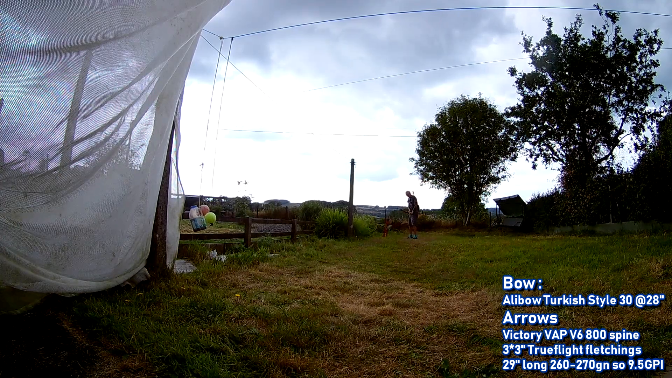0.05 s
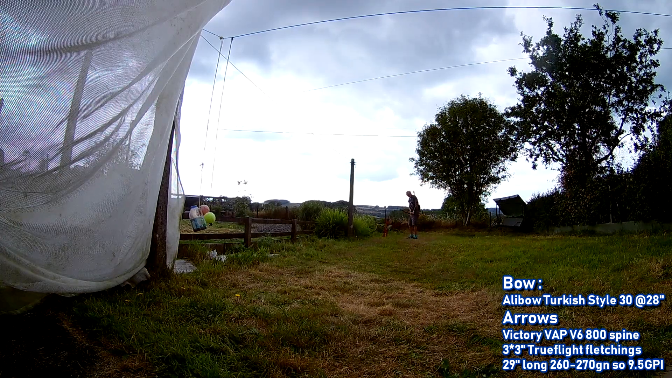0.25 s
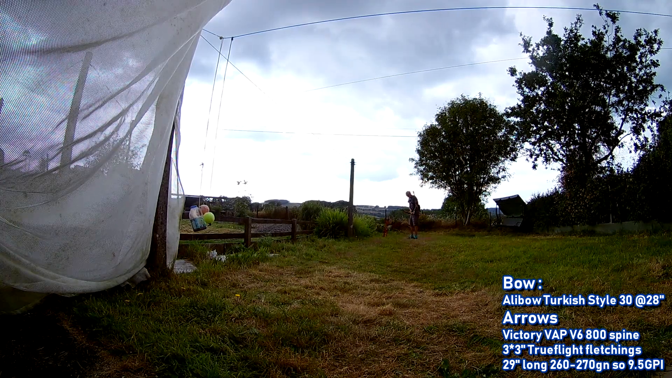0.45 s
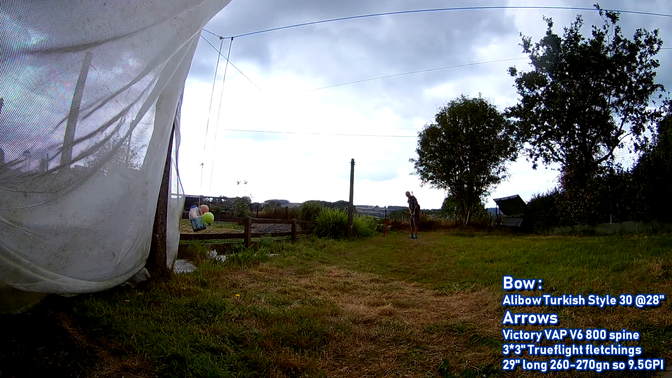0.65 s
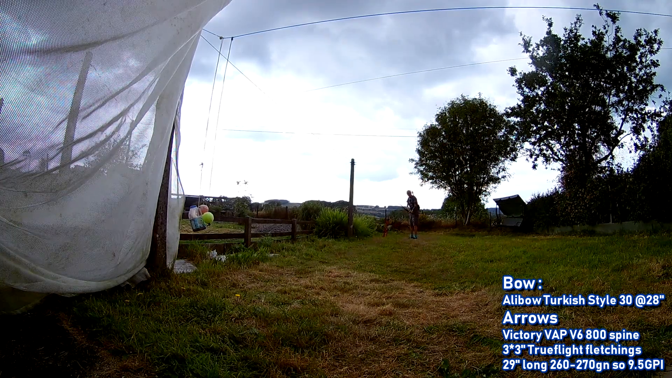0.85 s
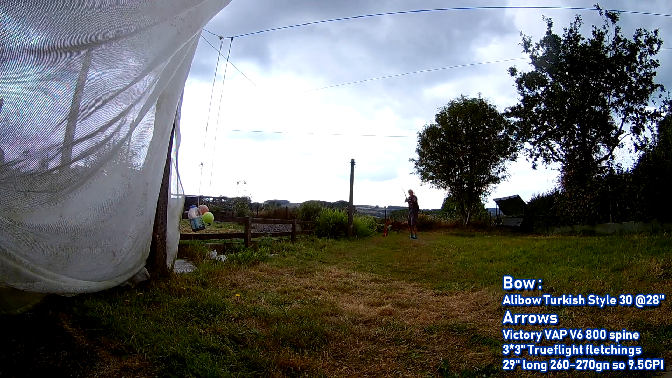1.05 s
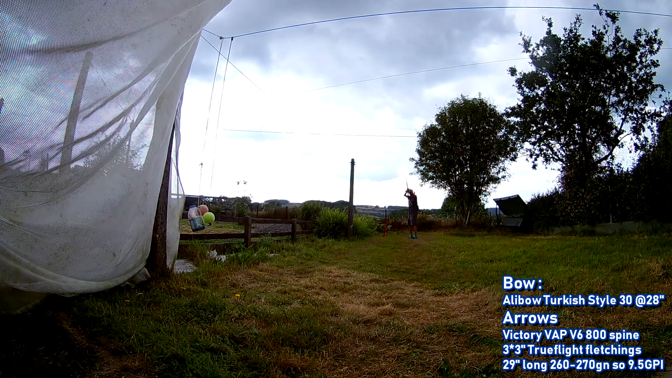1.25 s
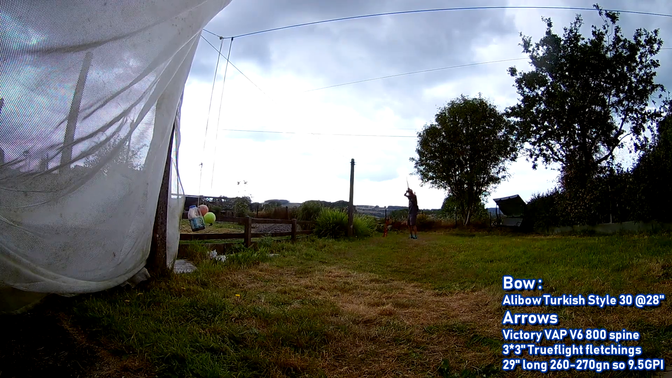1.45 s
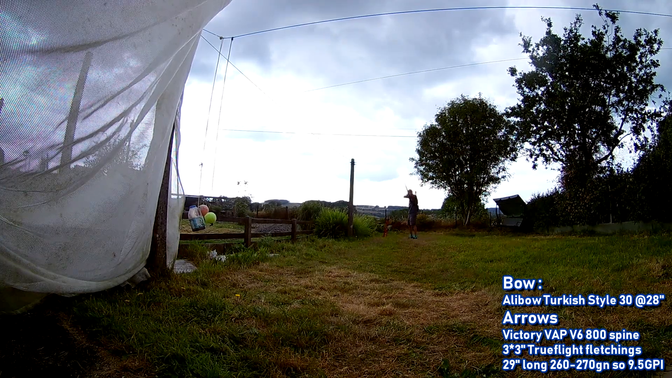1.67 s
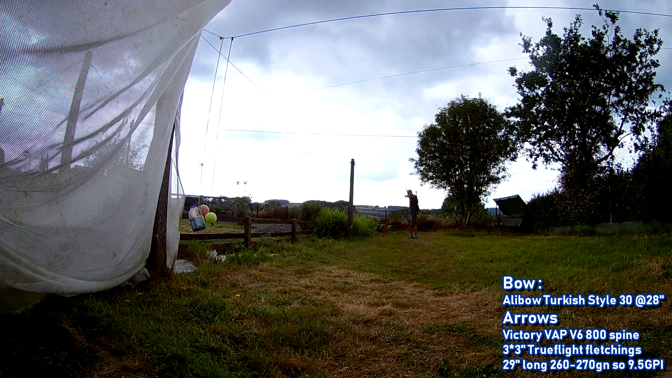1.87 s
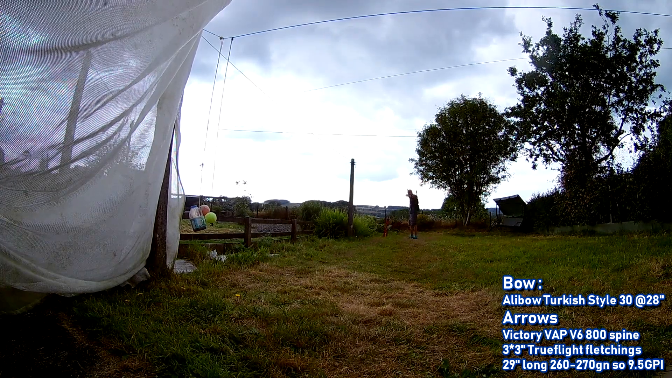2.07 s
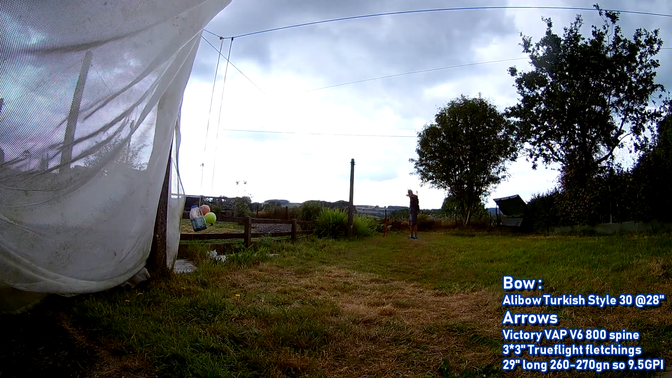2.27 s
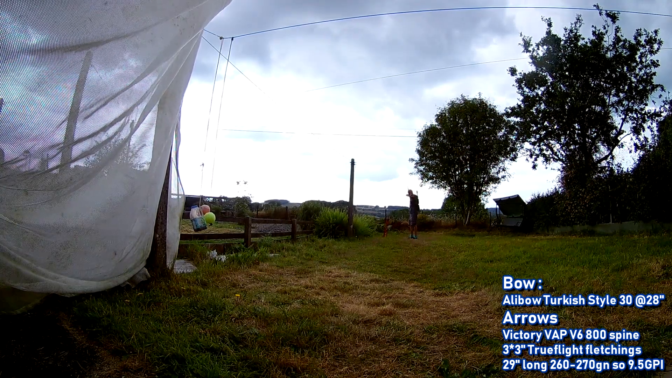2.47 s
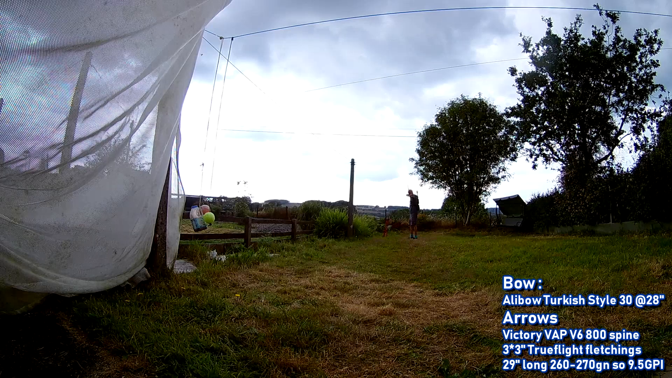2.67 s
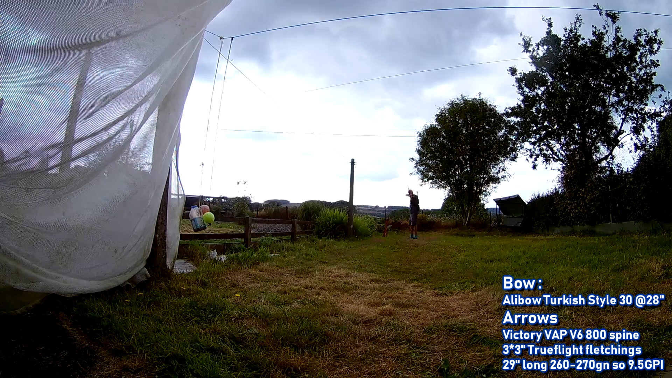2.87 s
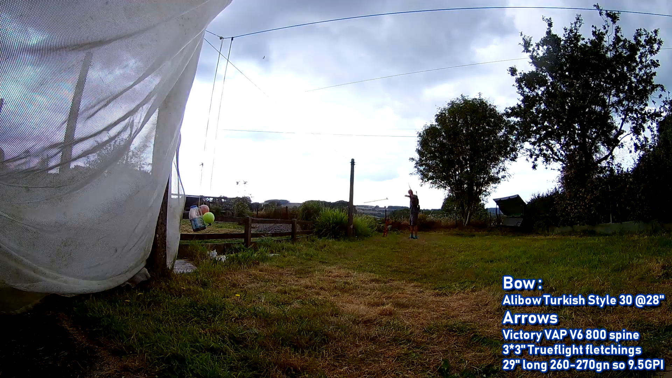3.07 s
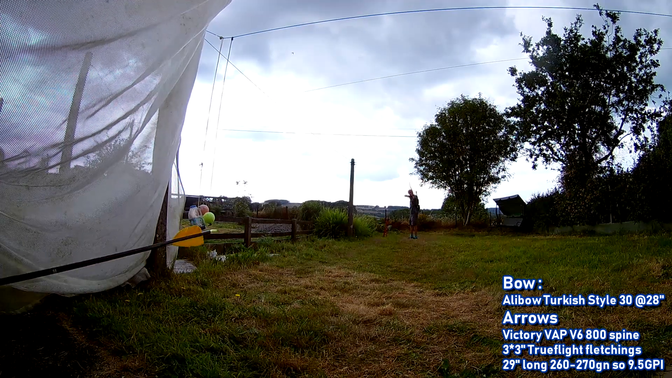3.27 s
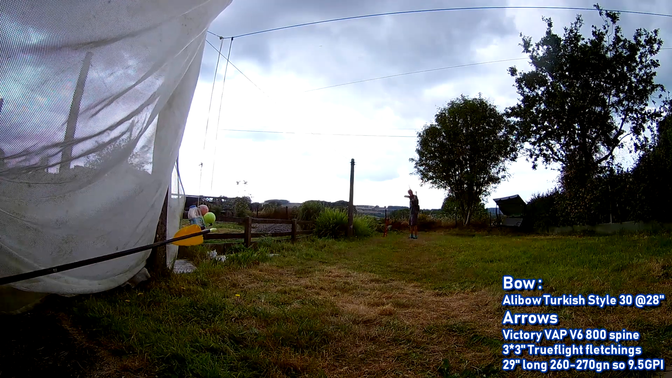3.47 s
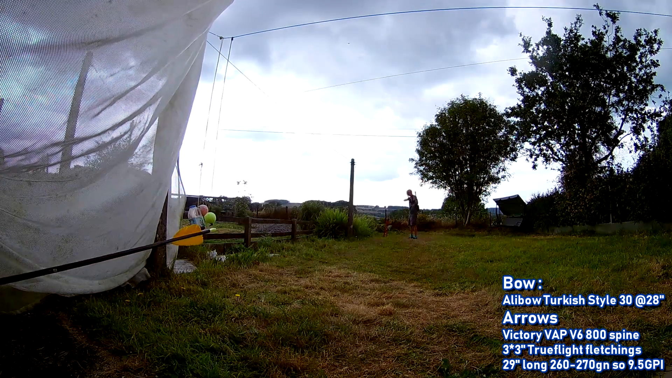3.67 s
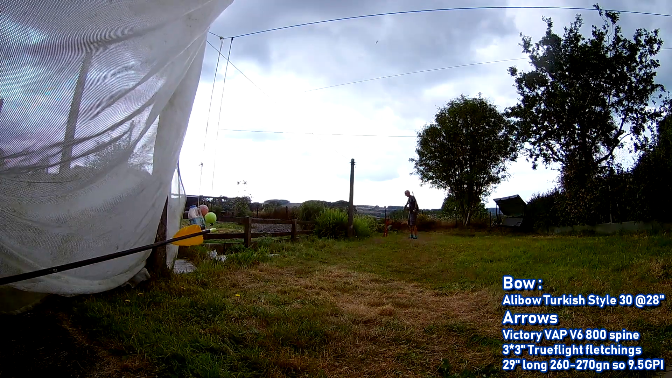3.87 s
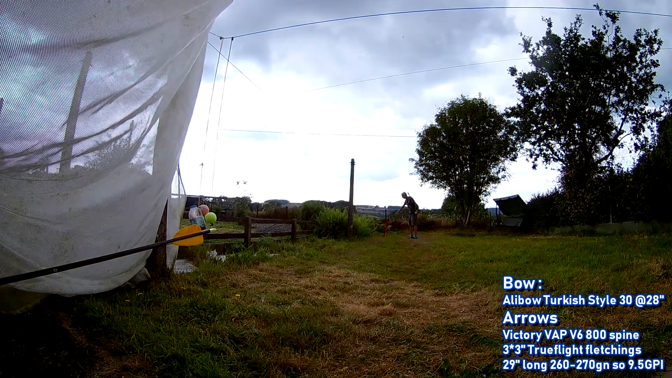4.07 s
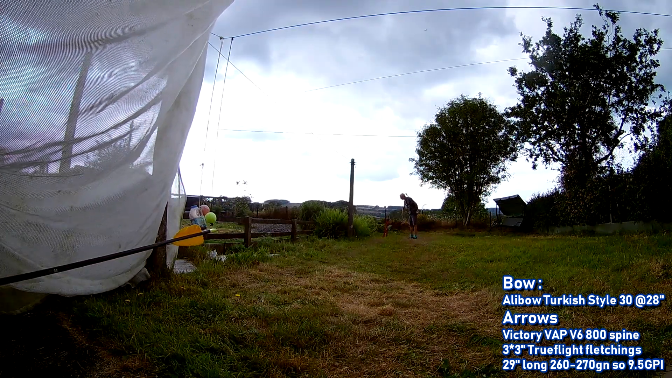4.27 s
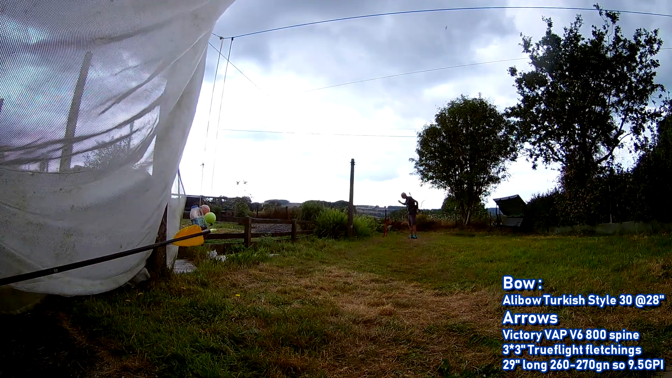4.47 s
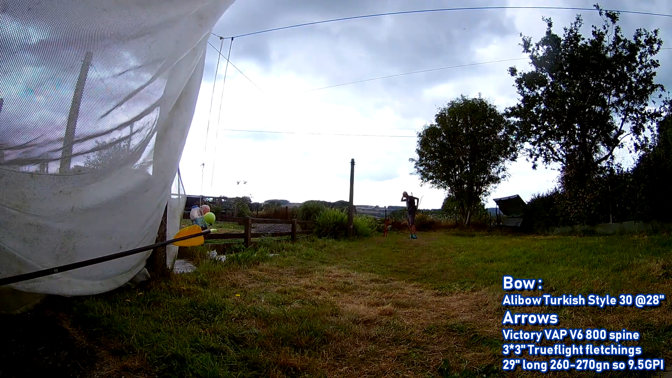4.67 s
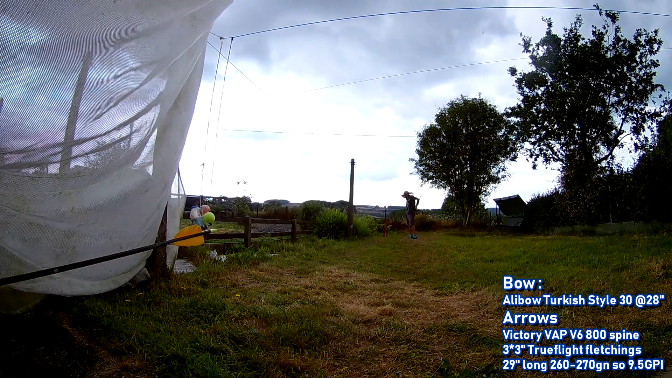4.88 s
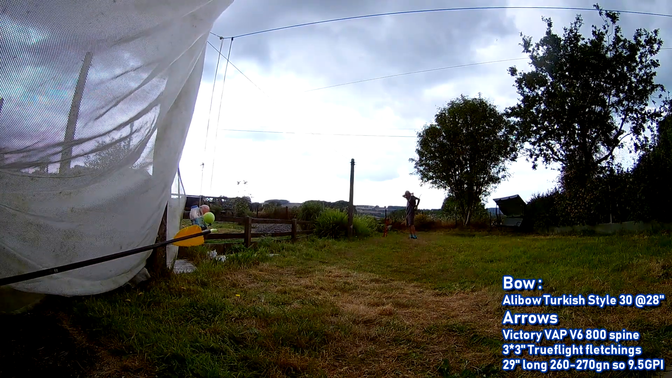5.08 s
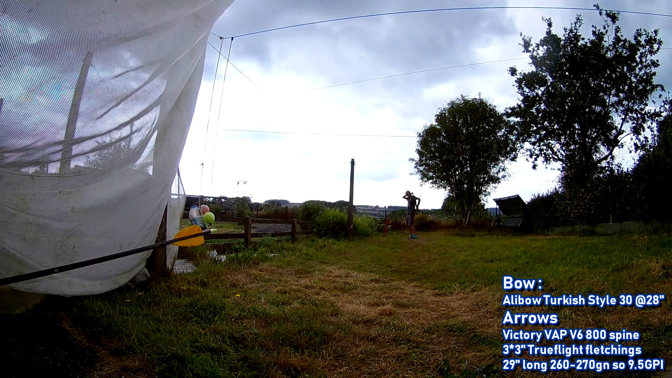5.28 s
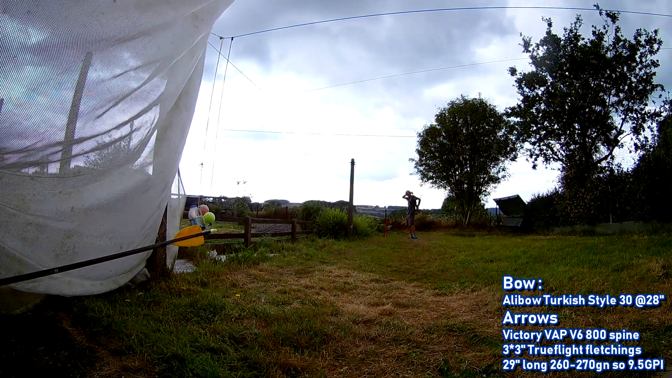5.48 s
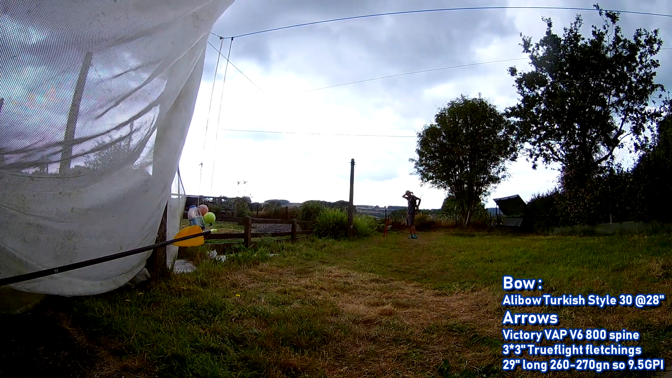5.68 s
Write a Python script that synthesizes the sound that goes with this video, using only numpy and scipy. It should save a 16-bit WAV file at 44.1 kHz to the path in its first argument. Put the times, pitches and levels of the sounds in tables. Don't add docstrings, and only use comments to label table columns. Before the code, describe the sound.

A breezy outdoor lawn heard from a small camera beside a foam target. From 0 to about 2.3 s, low gusts throb and flutter on the microphone, strongest in the first two seconds, over distant tyre roar, a soft whine and light hiss. Tiny birds give faint, high two-note chips from about 0.8 s, with brief twitters near 2.9 and 3.4 s. At 2.98 s a distant bowstring slips and smacks home, a small dry click followed by quick woody knocks and rattle. From 3.04 s feathers hiss and the flexing shaft hums, swelling fast. At 3.20 s the arrow hits very close: one sharp, overloaded crack with a low thud, crunching foam and a tiny scrape, gone within a fraction of a second. Then a car's roar peaks around 3.6 s, a low gust bumps near 3.9 s, and soft traffic, wind and sparse bird calls continue to about 5.7 s.

```python
import sys
import numpy as np
from scipy import signal
from scipy.fft import rfft, irfft, next_fast_len
from scipy.io import wavfile
from scipy.ndimage import uniform_filter1d

SR = 44100
rng = np.random.default_rng(int(sys.argv[2]) if len(sys.argv) > 2 else 0)


def gain_from_db(level_db):
    decades = np.asarray(level_db, float) / 20
    return 10 ** decades


def to_wav(sig):
    pcm = np.clip(np.atleast_2d(sig), -1, 1) * 32767
    pcm = np.round(pcm).astype(np.int16)
    wavfile.write(sys.argv[1], SR, pcm.T)


N = 252693
T = np.arange(N) / SR

# frequency in Hz, level in dB, t60 in s.
FACE_MODES = [(763, 6, 0.023), (977, 7, 0.032), (1213, 8, 0.02), (1348, -5, 0.053), (1630, 5, 0.014),
              (2550, -4.5, 0.018), (3920, -7, 0.011), (6330, -8, 0.012)]
# frequency in Hz, level in dB, t60 in s.
STUCK_SHAFT_MODES = [(321, 13, 0.027), (277.7, -7.5, 0.12), (393, 7, 0.026), (595, -2, 0.021),
                     (1080, -14, 0.087)]
# frequency in Hz, level in dB, t60 in s.
BLOCK_MODES = [(37, -16, 0.3), (88, -10, 0.16), (125, -6, 0.09), (200, -20, 0.12), (331, -15.5, 0.16)]
# centre in Hz, level in dB, t60 in s.
CRUSH_BANDS = [(198, -15.5, 0.17), (404, -7.5, 0.072), (740, -20, 0.12), (1450, -26, 0.2),
               (2670, -27, 0.12), (4540, -33.5, 0.088), (6500, -26, 0.04), (10000, -36, 0.045)]
# delay in ms, level in dB.
FACE_ECHOES = [(15.0, -14), (33, -34)]
# frequency in Hz, density in dB per Hz.
SCRAPE_COLOUR = [(2000, -8), (3000, 1), (6800, -3), (7800, -17), (12000, -22)]
# frequency in Hz, level in dB, decay in dB per s.
FLYING_SHAFT_MODES = [(272, -11, 0), (528, 1, -90), (885, -4, 80), (1290, -14, 0)]
# frequency in Hz, density in dB per Hz.
FEATHER_COLOUR = [(800, -8), (1500, 8), (2600, -7), (3900, 6), (5000, -12), (6200, 0), (8000, -22.5)]
# start in s, level in dB, ring in Hz.
LIMB_KNOCKS = [(3.0017, -17, 600), (3.0050, -17.5, 1210), (3.0063, -24, 380), (3.0088, -18, 1500),
               (3.013, -18, 1300), (3.0137, -23.5, 215), (3.0206, -17, 1600), (3.024, -16.5, 870),
               (3.0282, -15.5, 1550), (3.039, -24, 900), (3.052, -35, 1000), (3.066, -31, 1600)]
# frequency in Hz, density in dB per Hz.
BOW_COLOUR = [(150, -21), (600, 2), (1700, -6), (2000, -14), (3000, -26), (3600, -16), (4700, -24),
              (7000, -38)]
# frequency in Hz, density in dB per Hz.
GRIT_COLOUR = [(2900, -20), (3500, 7), (4750, 5), (4900, -12), (6000, -5), (6800, -20)]
# start in s, long note top in Hz, its level in dB,
# short note level in dB.
CALLS = [(.79, 5200, -62, -65), (1.2, 4900, -61, -67), (1.553, 5400, -62, -60), (2.04, 5350, -61, -64),
         (2.46, 5400, -61, -67), (3.85, 5200, -72, -61), (4.33, 5400, -64, -66), (4.75, 5300, -65, -61),
         (5.275, 5200, -69, -61)]
# start in s, start pitch in Hz, end pitch in Hz, length in ms,
# level in dB.
TWITTER_NOTES = [
    (2.865, 3900, 3850, 40, -64),
    (2.94, 5300, 5450, 22, -60),
    (2.963, 5380, 5600, 16, -53),
    (3.41, 5400, 5140, 22, -63),
    (3.445, 5200, 5680, 47, -58.5),
    (3.505, 5400, 5170, 20, -62),
    (4.985, 4950, 4810, 20, -66),
]
# frequency in Hz, density in dB per Hz.
BUFFET_COLOUR = [(20, -9), (40, -3), (60, 1), (90, -4), (130, -13), (200, -30)]
# frequency in Hz, density in dB per Hz.
FLUTTER_COLOUR = [(70, -22), (120, -1.5), (200, -4), (320, -10), (600, -32)]
# arrival in s, buffet level in dB, time to die by 20 dB in s,
# flutter above buffet in dB.
GUST_EVENTS = [(.11, -36, 0.6, -8), (.22, -31, 0.6, -7.5), (.38, -37.5, 0, -11), (.73, -41, .12, -3),
               (.84, -34.5, 0.36, -1.5), (.97, -30, 0.32, -7), (1.07, -35, 0.2, -4), (1.2, -38, .5, -5),
               (1.6, -36.5, 0.2, -4.5), (1.68, -33, 0.58, -3), (2.1, -42, 0.5, -12), (3.05, -42.5, .2, -12),
               (3.78, -43, 0.5, -11), (3.915, -31.5, 0.2, -13), (4.08, -42, 1.8, -14),
               (4.86, -39, 0.3, -12), (4.92, -40, .5, -12), (5.36, -46, 0, -12), (5.64, -43, .3, -15)]
# frequency in Hz, density in dB per Hz.
ROAR_COLOUR = [(250, -12), (400, -1.5), (600, -4), (800, -2), (1100, -2.5), (1400, -8), (2000, -31),
               (3500, -46)]
# frequency in Hz, density in dB per Hz.
WHINE_COLOUR = [(1100, -1.5), (1400, 2.5), (1700, 2.5), (1950, -5.5), (2500, -19)]
# frequency in Hz, width in Hz (unused), level in dB.
TREAD_TONES = [(977, 65, 1.5), (1558, 40, 0.5)]
# nearest at s, half width in s, roar level in dB, whine level in dB.
CAR_PASSES = [
    (.1, 0.47, -51, -58),
    (.9, 0.79, -56.5, -50),
    (3.6, 0.83, -50, -57.5),
    (4.4, 0.56, -53, -57),
    (5.7, 0.34, -52, -57),
]
# frequency in Hz, density in dB per Hz.
HISS_COLOUR = [(1060, -21.5), (1800, -5), (2100, -4), (3320, -8), (8150, -15.5), (11700, -15.5),
               (15200, -12), (16000, -15)]

SLIP_S, HOME_S = 2.982, 2.9986
HIT_S, WHIP_S, STOP_S, JOLT_S = 3.20145, 3.2044, 3.2058, 3.20595


def unit(x):
    return x / np.sqrt(np.mean(x ** 2))


def walk(rate_hz):
    hold = int(SR / rate_hz)
    steps = np.repeat(rng.standard_normal(N // hold + 1), hold)
    return unit(uniform_filter1d(uniform_filter1d(steps, hold), hold)[:N])


def air(colour, flicker_db=0., rate_hz=12):
    hz, db = np.transpose(colour)
    size = next_fast_len(N)
    f = np.maximum(np.arange(size // 2 + 1) * SR / size, 1)
    gain = gain_from_db(np.interp(np.log(f), np.log(hz), db, left=-120, right=-120))
    if not flicker_db:
        return unit(irfft(rfft(rng.standard_normal(size)) * gain, size)[:N])
    out = 0
    for octave in np.arange(np.log2(hz[0]), np.log2(hz[-1]) + .5, .5):
        share = np.sqrt(np.clip(1 - 2 * abs(np.log2(f) - octave), 0, 1))
        band = irfft(rfft(rng.standard_normal(size)) * gain * share, size)[:N]
        out = out + band * gain_from_db(flicker_db * walk(rate_hz))
    return unit(out)


def fade(start_s, t60_s):
    return (T >= start_s) * np.exp(-np.log(1000) * np.maximum(T - start_s, 0) / t60_s)


def ring(start_s, push_ms, modes, direction=1):
    free = sum(gain_from_db(db) * fade(start_s, t60_s) * np.sin(2 * np.pi * hz * (T - start_s))
               for hz, db, t60_s in modes)
    push = np.hanning(int(push_ms * SR / 1000) + 3)
    return direction * signal.lfilter(push / push.sum(), 1, free)


def even(x, span_s):
    span = int(span_s * SR)
    return x / np.sqrt(uniform_filter1d(uniform_filter1d(x ** 2, span), span))


def pile(levels):
    return np.sqrt(sum(np.square(level) for level in levels))


def foam_crush():
    crush = 0
    for hz, db, t60_s in CRUSH_BANDS:
        band = air([(hz / 2, -20), (hz / 1.7, 0), (hz * 1.23, -2), (hz * 1.44, -20)])
        crush = crush + gain_from_db(db) * fade(HIT_S, t60_s) * band
    crush = crush * (1 - fade(HIT_S, .02))
    halt_s = HIT_S + .038
    sliding = (T > HIT_S) * (T < halt_s) + fade(halt_s, .045)
    return crush + gain_from_db(-42.5) * sliding * air(SCRAPE_COLOUR)


def strike():
    face = ring(HIT_S, .1, FACE_MODES)
    early = face + foam_crush() * gain_from_db(2.2 * walk(400))
    dulled = uniform_filter1d(face, size=16)
    echoes = sum(gain_from_db(db) * np.roll(dulled, int(ms * SR / 1000)) for ms, db in FACE_ECHOES)
    jolt = gain_from_db(-3) * ring(JOLT_S, .1, [mode for mode in FACE_MODES if mode[0] > 2000], -1)
    whip = ring(WHIP_S, .4, STUCK_SHAFT_MODES)
    thud = ring(STOP_S, 1.5, BLOCK_MODES, -1)
    lurch_ms, lurch_db = 11.1, 1.0
    swing = np.clip((T - STOP_S) * 1000 / lurch_ms, 0, 1)
    lurch = -gain_from_db(lurch_db) * np.sin(2 * np.pi * swing)
    return early + jolt + echoes + whip + thud + lurch


def flight():
    near_db, closing_db_per_s = -36.5, 166
    feathers_from_s, sings_from_s, sings_rise_s = 3.04, 3.095, .04
    left_s = np.clip(HIT_S - T, 0, 1)
    flex = 0
    for hz, db, decay_db_per_s in FLYING_SHAFT_MODES:
        phase = rng.uniform(0, 2 * np.pi)
        flex = flex + gain_from_db(db + decay_db_per_s * left_s) * np.sin(2 * np.pi * hz * T + phase)
    flex = flex * gain_from_db(2.5 * walk(60))
    level_db = near_db - closing_db_per_s * abs(HIT_S - T)
    sings = np.clip((T - sings_from_s) / sings_rise_s, 0, 1)
    song = np.sqrt(2) * gain_from_db(level_db) * sings * flex
    hiss = gain_from_db(0.4 * level_db - 36.5) * air(FEATHER_COLOUR)
    aloft = (T > feathers_from_s) * (T < HIT_S)
    return aloft * (song + hiss)


def loose():
    creak_db, rattle_db, after_db = -43, -32.5, -40
    still_s, after_t60_s = HOME_S + 0.037, 0.34
    slip_db, slip_hz, slip_grit_db = -31, 700, -35
    smack_db, smack_hz, smack_cycles = -10, 600, 3
    knock_cycles, more_cycles_per_khz, grit_db = 6, 6, -25
    grit = air(GRIT_COLOUR)
    shaking = gain_from_db(creak_db) * (T > SLIP_S) * (T < HOME_S)
    shaking = shaking + gain_from_db(rattle_db) * (T >= HOME_S) * (T < still_s)
    shaking = shaking + gain_from_db(after_db) * fade(still_s, after_t60_s)
    out = uniform_filter1d(shaking, size=200) * gain_from_db(2.0 * walk(300)) * air(BOW_COLOUR)
    out = out + gain_from_db(slip_grit_db) * fade(SLIP_S, 0.013) * grit
    out = out + ring(HOME_S, .3, [(smack_hz, smack_db, smack_cycles / smack_hz)])
    for start_s, db, hz in [(SLIP_S, slip_db, slip_hz), *LIMB_KNOCKS]:
        cycles = knock_cycles + more_cycles_per_khz * hz / 1000
        out = out + ring(start_s, .3, [(hz, db, cycles / hz)])
        out = out + gain_from_db(db + grit_db) * fade(start_s, 0.0091) * grit
    return out


def whistle(start_s, from_hz, to_hz, ms, db, arch_hz=0):
    part = np.clip((T - start_s) * 1000 / ms + .25, 0, 1)
    glide = from_hz * part + (to_hz - from_hz) * part ** 2 / 2
    turns = ms / 1000 * (glide - arch_hz * np.cos(np.pi * part) / np.pi)
    swell = np.sqrt(abs(np.sin(np.pi * part))) * (part < 1)
    return gain_from_db(db + 3.0) * swell * np.sin(2 * np.pi * turns)


def birds():
    long_arch_hz, long_ms = 1200, 52
    short_after_s, short_top_hz, short_arch_hz, short_ms = .098, 4550, 600, 33
    short_foot_hz = short_top_hz - short_arch_hz
    out = 0
    for start_s, top_hz, long_db, short_db in CALLS:
        foot_hz = top_hz - long_arch_hz
        out = out + whistle(start_s, foot_hz, foot_hz, long_ms, long_db, long_arch_hz)
        out = out + whistle(start_s + short_after_s, short_foot_hz, short_foot_hz, short_ms,
                            short_db, short_arch_hz)
    for note in TWITTER_NOTES:
        out = out + whistle(*note)
    broken = out * (.7 + .7 * walk(1200))
    scatter = rng.standard_normal(4096) * fade(0, .09)[:4096]
    echoes = signal.fftconvolve(broken, .8 * scatter / np.linalg.norm(scatter))[:N]
    return .55 * broken + echoes


def gust(start_s, db, dies_s):
    rise_s = 0.026
    fall = 10 ** -np.maximum((T - start_s - rise_s) / dies_s, 0)
    return gain_from_db(db) * np.clip((T - start_s) / rise_s, 0, 1) * fall


def wind():
    breeze_db, breeze_flutter_db, breeze_sway_db = -45.5, -49, 2.0
    flutter_lasts = 0.87
    sway_db = breeze_sway_db * walk(14)
    push, flap = [gain_from_db(breeze_db + sway_db)], [gain_from_db(breeze_flutter_db + sway_db / 2)]
    for start_s, db, dies_s, up_db in GUST_EVENTS:
        push.append(gust(start_s, db, dies_s))
        flap.append(gust(start_s, db + up_db, dies_s * flutter_lasts))
    throb = gain_from_db(2.2 * walk(60))
    buffet = even(throb * air(BUFFET_COLOUR), .06)
    flutter = even(throb * air(FLUTTER_COLOUR), .06)
    return pile(push) * buffet + pile(flap) * flutter


def road():
    roar_gains, whine_gains = [gain_from_db(-48.5)], [gain_from_db(-59)]
    for nearest_s, half_s, roar_db, whine_db in CAR_PASSES:
        near = 1 / (1 + ((T - nearest_s) / half_s) ** 2)
        roar_gains.append(gain_from_db(roar_db) * near)
        whine_gains.append(gain_from_db(whine_db) * near)
    roar = air(ROAR_COLOUR, flicker_db=.6, rate_hz=10)
    whine = air(WHINE_COLOUR, flicker_db=.6, rate_hz=10)
    tread = sum(gain_from_db(db) * air([(hz - 12, 0), (hz + 12, 0)]) for hz, _, db in TREAD_TONES)
    return pile(roar_gains) * roar + pile(whine_gains) * (whine + gain_from_db(-8.5) * tread)


def scene():
    return (strike() + flight() + loose() + birds() + wind() + road())[None, :]


def roll_off(x):
    return signal.sosfilt(signal.butter(12, 16180, fs=SR, output="sos"), x)


def record(dry):
    capsule_hz, hiss_db = 12400, -56.5
    overloaded = np.clip(dry, -1.012, 1.012)
    rounded = signal.sosfilt(signal.butter(2, capsule_hz, fs=SR, output="sos"), overloaded)
    mix = rounded + gain_from_db(hiss_db) * air(HISS_COLOUR)
    return roll_off(mix)


dry = scene()
out = record(dry)
to_wav(out)
```